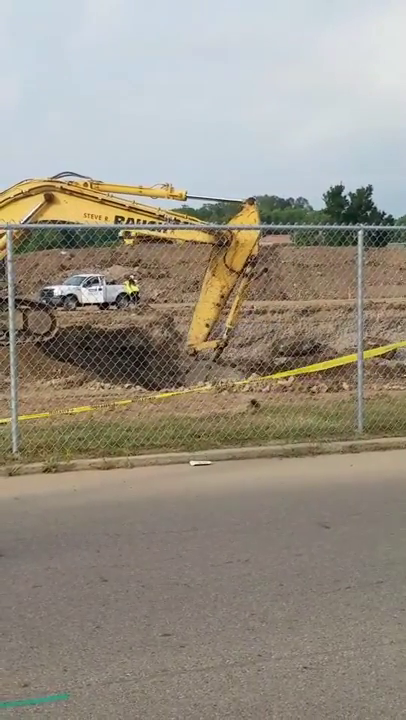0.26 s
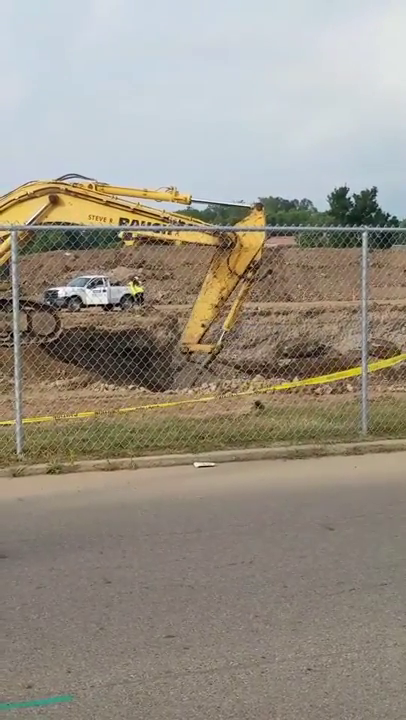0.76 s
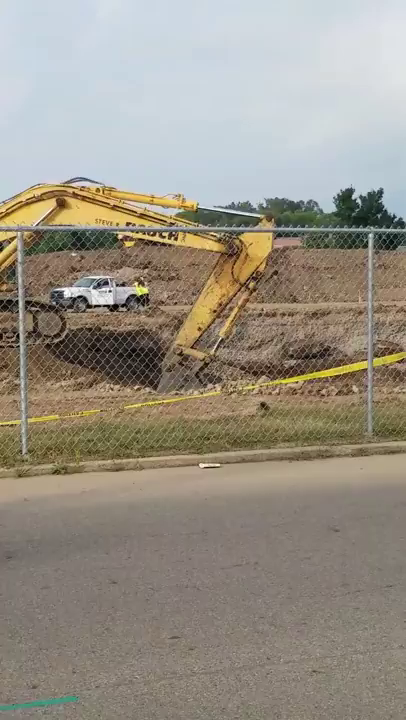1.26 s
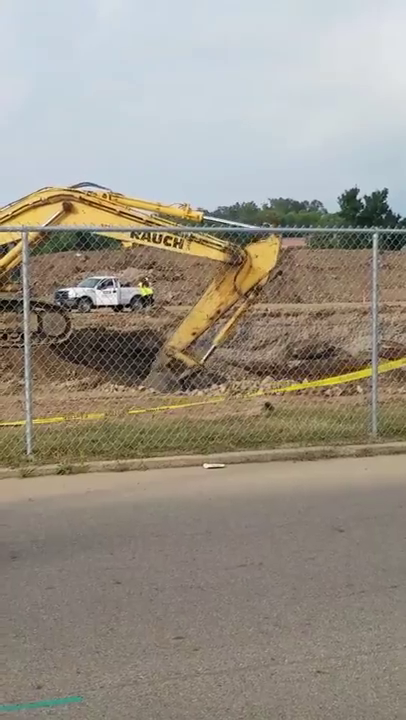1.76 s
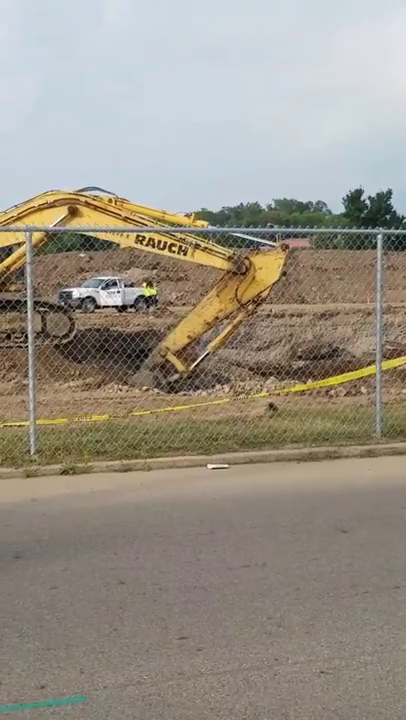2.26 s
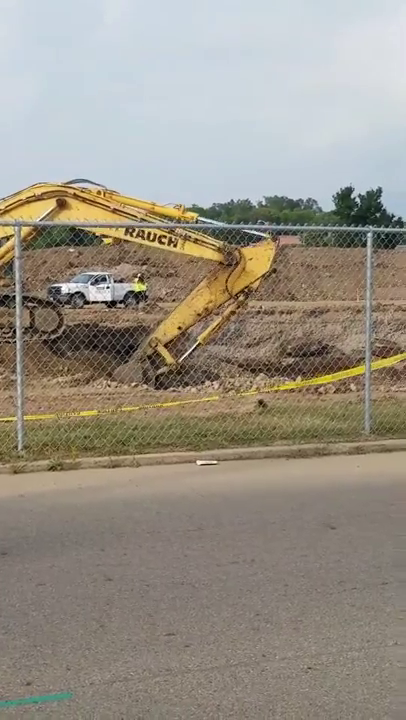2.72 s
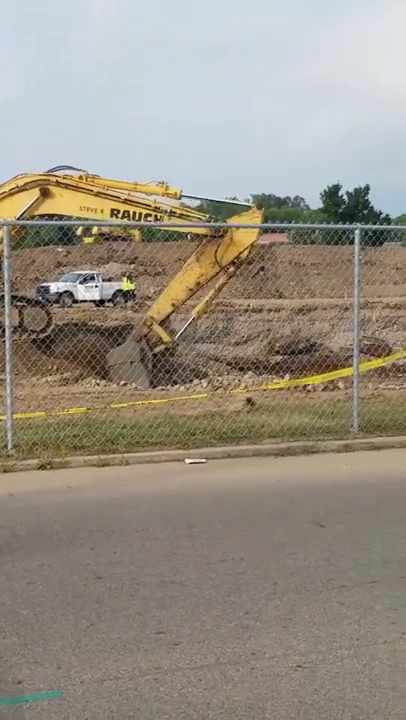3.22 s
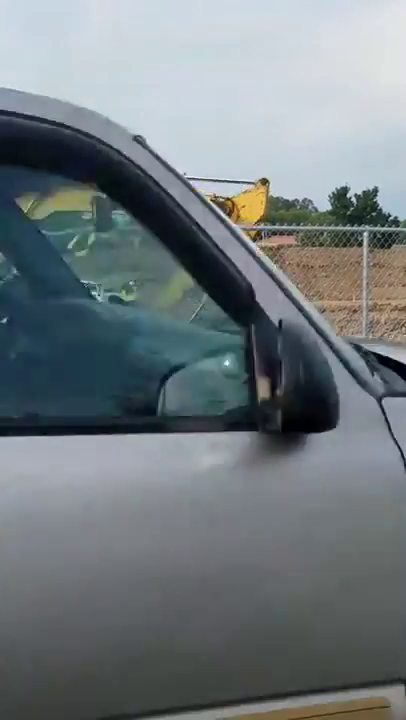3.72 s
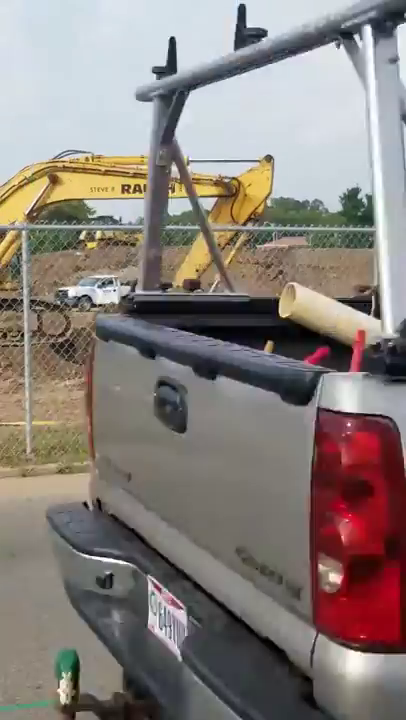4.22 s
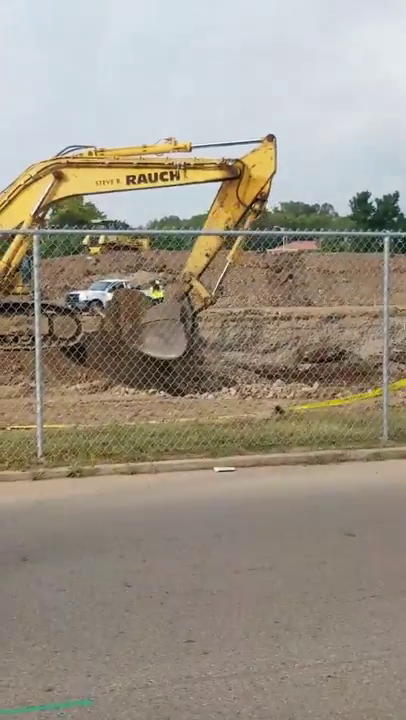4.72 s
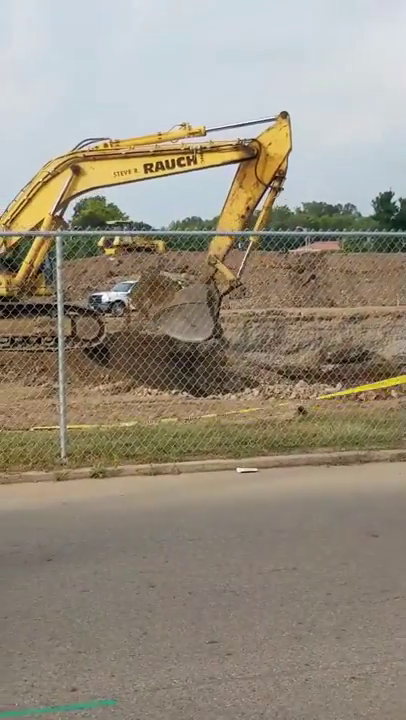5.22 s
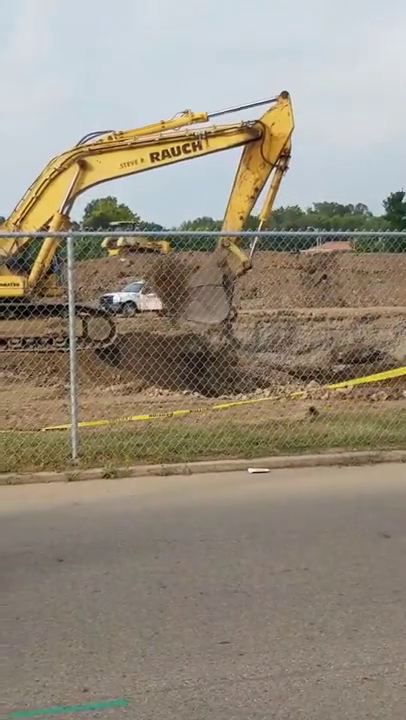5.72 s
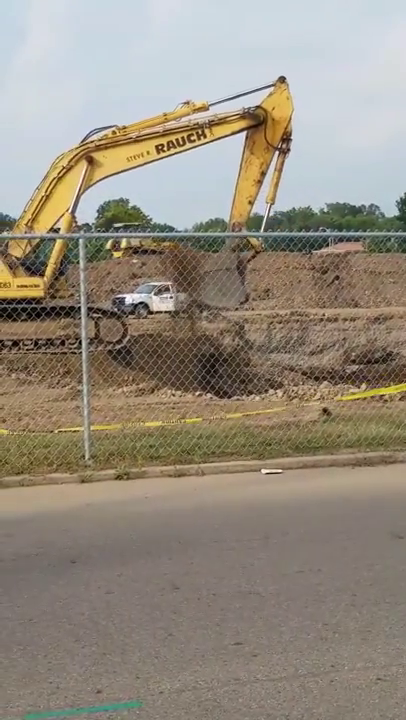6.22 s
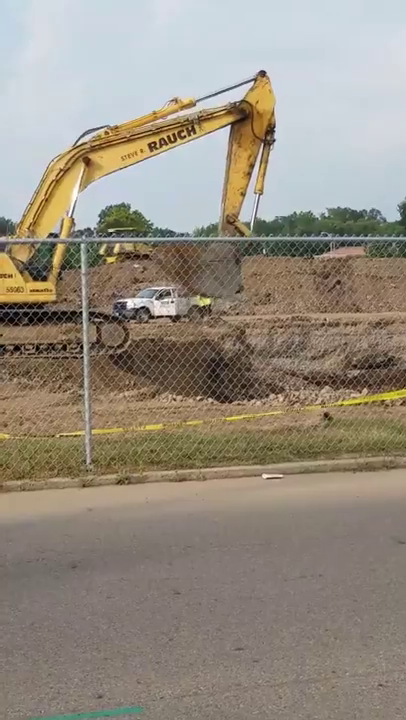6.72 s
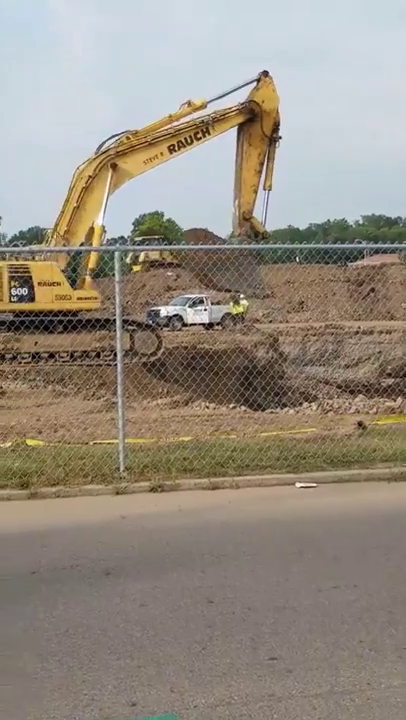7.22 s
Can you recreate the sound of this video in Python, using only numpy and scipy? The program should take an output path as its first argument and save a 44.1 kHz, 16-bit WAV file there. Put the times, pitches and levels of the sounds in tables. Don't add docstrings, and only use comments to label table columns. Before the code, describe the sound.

A large diesel excavator digs with a loud, steady low pump drone over engine roar while wind flutters and a pickup truck rolls closely past.

```python
import sys
import numpy as np
from scipy import signal
from scipy.fft import rfft, irfft
from scipy.io import wavfile

SR = 44100
rng = np.random.default_rng(int(sys.argv[2]) if len(sys.argv) > 2 else 0)


def ratio_of_db(decibels):
    return 10 ** (np.asarray(decibels, float) / 20)


def wrap_up_sound(samples):
    columns = np.atleast_2d(samples).T
    tamed = np.clip(columns, -1, 1)
    steps = np.round(tamed * 32767).astype(np.int16)
    wavfile.write(sys.argv[1], SR, steps)


N = 329427
T = np.arange(N) / SR
HZ = np.maximum(np.fft.rfftfreq(N, 1 / SR), 1)
SIDES = np.array([[0.5], [-0.5]])


def rms_one(x):
    return x / np.sqrt(np.mean(x ** 2) + 1e-20)


def in_time(rows):
    s, *columns = np.transpose(rows)
    return [np.interp(T, s, c) for c in columns]


def over_hz(rows):
    hz, *columns = np.transpose(rows)
    return [np.interp(np.log(HZ), np.log(hz), c) for c in columns]


def colour(spectrum):
    inside = (HZ >= spectrum[0][0]) * (HZ <= spectrum[-1][0])
    return ratio_of_db(over_hz(spectrum)[0]) * inside


def noise(gain):
    return rms_one(irfft(gain * rfft(rng.standard_normal(N)), N))


def hump(hz, width_hz):
    return np.exp(-((HZ - hz) / width_hz) ** 2)


def drift(rate_hz):
    return noise(1 / (1 + (HZ / rate_hz) ** 2))


def bell(s, length_s):
    return np.exp(-((T - s) / length_s) ** 2)


def facing(away_db, toward_db):
    return np.interp(T, [1.9, 4.8], [away_db, toward_db])


def screen_db():
    return -5 * bell(3.8, 0.32)


# start_s, level_db
EFFORT = [(0, 0.5), (.5, -.5), (1.1, 0.45), (1.7, -0.5), (2.3, -2), (2.9, -2.5), (3.15, 1.5), (3.6, -0.5),
          (4.3, 0.5), (4.8, 0.5), (5.3, 1), (5.7, 2.5), (6.3, 1.5), (6.75, 2), (7.0, 3.5), (7.3, 3.5),
          (7.47, 2.5)]


def layer_db(rule):
    away_db, toward_db, effort_share, screen_share = rule
    return facing(away_db, toward_db) + effort_share * in_time(EFFORT)[0] + screen_share * screen_db()


# pitch_hz, likeness_0_to_1, left_minus_right_db, left_lead_radians
PORTS = [(99, 0.95, 0.5, -0.5), (330, .985, .5, 0.1), (590, 0.91, 1, 0), (980, 0.92, -3, 0),
         (1630, 0.91, -2, 0.5), (2700, 0.68, -4.5, 0.2), (3660, 0.3, -1, 1.7), (4600, 0.3, -3.5, 0.5),
         (5240, 0, -7, 3), (6900, 0.06, 11, 10.5), (7160, 0.7, 7.5, 2.5), (9300, 0.2, 2, 7.5),
         (10700, 0.13, -4, 7), (12700, 0, 3.5, -1.5), (14500, .35, -8, 11.5), (16400, .25, -3.5, 10)]
# pitch_hz, width_hz, level_db
GROUND_DIP = (729, 60, -11.5)


def at_ports(gain):
    alike, tilt_db, lead = over_hz(PORTS)
    alike = np.clip(alike, 0, 1)
    dip_hz, dip_width_hz, dip_db = GROUND_DIP
    direct, left, right = rfft(rng.standard_normal((3, N)))
    direct = np.sqrt(alike) * ratio_of_db(dip_db * hump(dip_hz, dip_width_hz)) * direct
    left = direct * np.exp(1j * lead) + np.sqrt(1 - alike) * left
    right = direct + np.sqrt(1 - alike) * right
    ports = np.array([left * ratio_of_db(tilt_db / 2), right * ratio_of_db(-tilt_db / 2)])
    return rms_one(irfft(gain * ports, N))


# start_s, pitch_hz, level_db
DRONE = [(0.0, 166.1, -8.5), (0.25, 164.8, -7), (1.5, 165.9, -8), (2.02, 164.8, -7.5), (2.35, 163.5, -8),
         (2.7, 161.8, -8.5), (2.97, 170.8, -10), (3.16, 171.6, -13), (3.45, 166.3, -17.5),
         (3.75, 170.4, -17), (3.95, 166.7, -17), (4.45, 168.7, -14.5), (4.64, 168.8, -15),
         (4.8, 166.1, -15), (5.37, 166.1, -15.5), (6.62, 166.2, -12.5), (6.85, 167.3, -14.5),
         (7.47, 167.7, -14)]
# away_db, toward_db, racing_gain_db
OVERTONES = [(-35, -33.5, 6), (-48, -42, 12), (-41.5, -39.7, -2)]
# centre_s, level_db, length_s
CANCELS = [
    (3.536, -5.5, .08),
    (3.857, -8, .045),
    (3.872, -8, 0.093),
    (4.308, -2.5, 0.074),
    (4.749, -3.5, 0.039),
]
SLEW = (7.05, 0.65)


def pump():
    pitch_hz, level_db = in_time(DRONE)
    level_db = level_db + sum(db * bell(s, length_s) for s, db, length_s in CANCELS)
    phase = 2 * np.pi * np.cumsum(pitch_hz + 0.44 * drift(13.6)) / SR
    tone = ratio_of_db(level_db + 0.71 * drift(51)) * np.sin(phase)
    racing = bell(3.15, 0.24) + 0.27 * bell(*SLEW)
    for k, (away_db, toward_db, race_db) in enumerate(OVERTONES, start=2):
        overtone_db = facing(away_db, toward_db) + race_db * racing + 2 * screen_db()
        tone += ratio_of_db(overtone_db + 2 * drift(5)) * np.sin(k * phase + 0.3 * drift(5))
    return np.sqrt(2) * tone, phase


# pitch_hz, level_db per Hz
ROAR = [(220, -15), (370, -0.5), (393, -3), (466, -4.5), (505, -4.5), (667, -3), (713, -3.5), (886, -4.5),
        (953, -7), (1100, -5), (1800, -18), (2340, -30.5), (3960, -120)]
CLATTER = [(880, -6.5), (1560, -5), (1750, -9.5), (2430, -10.5), (2750, -13.5), (4550, -18.5), (6200, -30),
           (8060, -58.5), (13600, -120)]
HISS = [(4500, -21), (5800, -5), (6500, -7), (7300, -6.5), (9100, -3), (10000, -6.5), (11000, -4),
        (12500, -7), (15800, -16.5)]
BOOM = [(40, -22), (90, -7), (140, -5.5), (200, -2), (260, 0), (330, -1), (400, -28), (520, -28)]
# pitch_hz, width_hz, level_db
TENTH_ORDER = (906, 51, -50.5)
# away_db, toward_db, effort_share, screen_share
ROAR_RULE, CLATTER_RULE = (-29, -26.5, 0.76, 0.44), (-34.5, -34.5, 1.37, 3.3)
HISS_RULE, BOOM_RULE = (-50.5, -52, 1.76, 0.5), (-25.5, -29.5, 0.13, 1.7)


def engine(pump_phase):
    throb = 1 + 0.11 * np.sin(pump_phase)
    out = ratio_of_db(layer_db(ROAR_RULE) + 0.69 * drift(4.4)) * throb * at_ports(colour(ROAR))
    out += ratio_of_db(layer_db(CLATTER_RULE) + 0.53 * drift(30)) * at_ports(colour(CLATTER))
    out += ratio_of_db(layer_db(HISS_RULE) + 1.1 * drift(11)) * at_ports(colour(HISS))
    tenth_hz, tenth_width_hz, tenth_db = TENTH_ORDER
    out += ratio_of_db(tenth_db + screen_db()) * at_ports(hump(tenth_hz, tenth_width_hz))
    return out + ratio_of_db(layer_db(BOOM_RULE)) * at_ports(colour(BOOM))


# away_db, toward_db, load_gain_db
FIRING_ORDERS = [(-32, -42, 7), (-44, -33.5, 0)]
ORDER_WIDTHS_HZ = [7, 5]
FIRING_HZ = 88.9


def firing():
    loaded = bell(2.1, 0.3) + bell(*SLEW)
    phase = 2 * np.pi * np.cumsum(FIRING_HZ + 0.7 * drift(3)) / SR
    out = np.zeros(N)
    for k, (away_db, toward_db, load_db), width_hz in zip([1, 4], FIRING_ORDERS, ORDER_WIDTHS_HZ):
        order_db = facing(away_db, toward_db) + load_db * loaded + 2 * screen_db()
        skirt = 0.6 * noise(hump(k * FIRING_HZ, width_hz))
        out += ratio_of_db(order_db) * (skirt + np.sin(k * phase))
    return out


# start_s, pitch_hz
TURBO = [(0, 14210), (1, 14369), (1.5, 14450), (2.2, 14490), (2.7, 14590), (3.1, 14740), (3.6, 14820),
         (4.25, 14680), (5.5, 14600), (6.5, 14600), (7.47, 14640)]
# pitch_hz, level_db per Hz
INTAKE = [(10500, -12), (11500, -6), (12600, -5), (13800, -2), (14600, -0.5), (15200, -4), (15800, -14.5)]
# away_db, toward_db, effort_share, screen_share
TURBO_RULE, INTAKE_RULE = (-60.5, -63.5, 0.6, 2.5), (-52, -58, 1.4, -1)


def turbo():
    phase = 2 * np.pi * np.cumsum(in_time(TURBO)[0] + 22 * drift(60)) / SR
    line_db = layer_db(TURBO_RULE) + 1.5 + 2.5 * drift(10)
    line = ratio_of_db(line_db) * np.sin(phase + np.array([[0.5], [0]])) * ratio_of_db(np.array([[1], [4]]))
    rush = ratio_of_db(layer_db(INTAKE_RULE) + 1.5 * drift(12)) * at_ports(colour(INTAKE))
    return line + rush


# start_s, level_db
WIND = [(0, -36), (.8, -27.5), (1.5, -30), (2.2, -21), (2.85, -23), (3.3, -40.5), (4.2, -33), (5.0, -42),
        (5.6, -33.5), (6.3, -51), (7.0, -40.5), (7.47, -38)]
# centre_s, level_db above the wind, left_minus_right_db, length_s
GUSTS = [(.3, 3, -2, .06), (.5, 0, 11, .05), (0.758, 5, 4.5, .1), (1.253, 8.5, -4, 0.11),
         (1.47, 2, -6.5, 0.059), (1.634, 3, 12, 0.04), (1.862, 5, 2.5, 0.066), (2.166, 2, 5, .1),
         (2.4, -1.5, -5.5, .05), (2.566, 8, 10, 0.074), (2.681, 4.5, -2.5, 0.056), (2.85, 1.5, -8, 0.044),
         (3.005, 6, -6, .05), (3.217, 4, 13, .05), (3.648, 10.5, -7, 0.055), (4.22, 7, -3, .06),
         (4.55, -1, 4, .05), (5.2, 9, -9, .06), (5.45, 9, -5, 0.085), (5.67, 6, 0, .06),
         (5.951, 12, 10, 0.059), (6.45, 12, 2, .1), (6.799, 12.5, 13, 0.071), (7.0, 9, -9, 0.12),
         (7.3, 0, -9, 0.065)]
# centre_s, level_db, left_minus_right_db, length_s
EDDIES = [(0.722, -41, 2, 0.048), (1.213, -29, -11, .04), (1.649, -36, 6, 0.034), (1.84, -24, -5, .03),
          (2.279, -26, 5, 0.034), (2.596, -25, 16, 0.021), (2.675, -23, -12, 0.032),
          (2.853, -23, -15, 0.043), (3.016, -27, -6, 0.04), (3.766, -28.5, -8, 0.019), (4.28, -29, 3, 0.17),
          (5.58, -29, -4, .13), (2.097, -32, 1, .15), (4.048, -27, -8, 0.037), (4.542, -28.5, -11, 0.067),
          (4.951, -29, -5, 0.032), (5.38, -23, 4, 0.023), (5.48, -26, -9, 0.035), (5.7, -26, 7, 0.041),
          (5.948, -25, 13, .04), (6.64, -29, 2, 0.037), (6.956, -28, -11, 0.031)]
# pitch_hz, level_db per Hz
RUMBLE = [(20, -17.5), (40, -11), (70, -3), (130, -4.5), (200, -7.5), (300, -26)]
FLUTTER = [(100, -26), (200, 1), (350, -5.5), (600, -14), (900, -28.5)]
EDDY_COLOUR = [(40, -13), (120, 5), (300, 2), (500, -5.5), (750, -21.5), (1000, -42.5)]


def wind():
    ports = []
    wind_db = in_time(WIND)[0]
    gusts_db = sum((db + SIDES * pan_db) * bell(s, length_s) for s, db, pan_db, length_s in GUSTS)
    bursts = sum(ratio_of_db(db + SIDES * pan_db) * bell(s, length_s) for s, db, pan_db, length_s in EDDIES)
    for gust_db, burst in zip(gusts_db, bursts):
        lumps_db = 2 * drift(16)
        rumble = ratio_of_db(wind_db + gust_db + 1.3 * lumps_db) * noise(colour(RUMBLE))
        flutter_db = -46 + 0.5 * (wind_db + 31) + 1.2 * gust_db + lumps_db
        flutter = ratio_of_db(flutter_db) * noise(colour(FLUTTER))
        ports.append(rumble + flutter + burst * noise(colour(EDDY_COLOUR)))
    return np.array(ports)


# start_s, end_s, pitch_hz, width_hz, level_db
VALVES = [
    (1.35, 2.2, 9050, 550, -57),
    (4.4, 7.4, 10970, 150, -68),
    (6.8, 7.2, 5900, 400, -58),
    (6.55, 6.8, 9000, 500, -60),
    (6.8, 7.25, 8300, 2500, -53),
    (5.6, 6.0, 9200, 500, -63),
    (5.3, 6.2, 4100, 350, -54),
]


def valves():
    out = np.zeros((2, N))
    for start_s, end_s, hz, width_hz, db in VALVES:
        gate = np.interp(T, [start_s, start_s + 0.083, end_s - 0.15, end_s], [0, 1, 1, 0])
        out += ratio_of_db(db) * gate * at_ports(hump(hz, width_hz))
    return out


# pitch_hz, level_db per Hz
TYRES = [(150, -31), (300, -13.5), (450, -10.5), (865, -9.5), (1400, -16.5), (2600, -24.5), (5000, -31.5),
         (10200, -43), (14500, -39.5), (15900, -38.5)]
# pitch_hz, likeness_0_to_1
TYRES_ALIKE = [(300, 1), (1000, 0.99), (2500, 0), (6000, 0.4), (16000, .3)]
PASS_S, NEAREST_M, ARRIVE_M_PER_S, LEAVE_M_PER_S = 3.58, 2.86, 9, 5.1
SOURCE_M, EAR_M, SOUND_M_PER_S = 0.35, 1.4, 343


def truck():
    along_m = (T - PASS_S) * np.where(T < PASS_S, ARRIVE_M_PER_S, LEAVE_M_PER_S)
    lag_ms = 0.23 * np.tanh((T - 3.2) / 0.63)
    alike = np.clip(over_hz(TYRES_ALIKE)[0], 0, 1)
    shares = np.sqrt([alike, 1 - alike, 1 - alike])
    shared, left, right = irfft(colour(TYRES) * shares * rfft(rng.standard_normal((3, N))), N)
    detour_m = 2 * SOURCE_M * EAR_M / np.hypot(along_m, NEAREST_M)
    shared = shared + 0.3 * np.interp(T - detour_m / SOUND_M_PER_S, T, shared)
    late = np.interp(np.arange(N) - lag_ms * SR / 1000, np.arange(N), shared)
    nearness = ratio_of_db(-25) / (1 + (along_m / NEAREST_M) ** 2) ** 0.71
    return nearness * rms_one(np.array([late + left, shared + right]))


# start_s, level_db at its peak
TICKS = [
    (6.0374, -30),
]


def grit():
    out, t = np.zeros((2, N)), np.arange(400) / SR
    for s, peak_db in TICKS:
        crack = np.diff(rng.standard_normal(len(t) + 1)) * np.exp(-t / 0.0015)
        start = round(s * SR)
        out[:, start:start + len(t)] += ratio_of_db(peak_db - 1) * crack
    return out


def scene():
    drone, phase = pump()
    drone = drone * ratio_of_db(-0.88 * SIDES)
    machine = drone + engine(phase) + firing() + turbo() + valves()
    return machine + wind() + truck() + grit()


def band_limit(x):
    return signal.sosfilt(signal.butter(12, 16160, fs=SR, output="sos"), x)


def record(dry):
    limited = dry / (1 + (np.abs(dry) / 0.97) ** 8) ** (1 / 8)
    mix = irfft(rfft(limited) * (HZ < 15750), N)
    return band_limit(mix)


dry = scene()
out = record(dry)
wrap_up_sound(out)
```